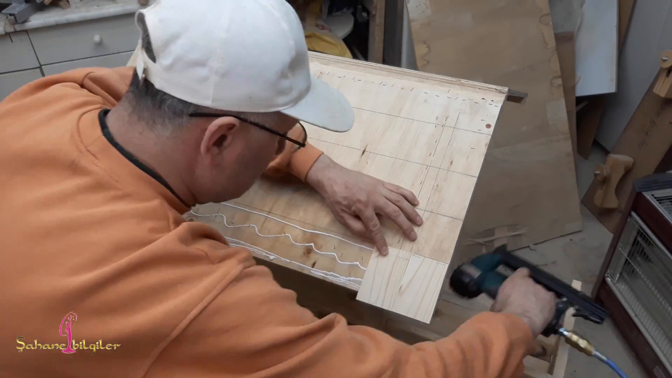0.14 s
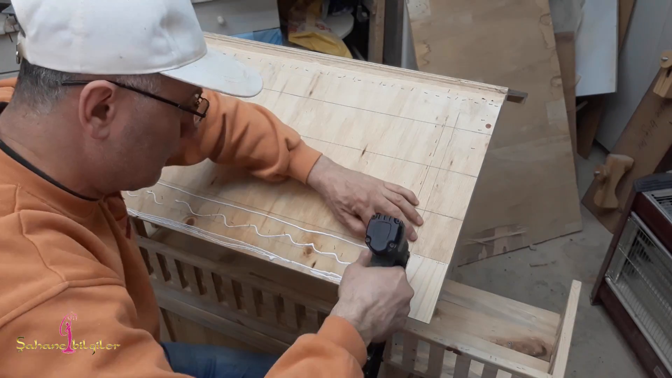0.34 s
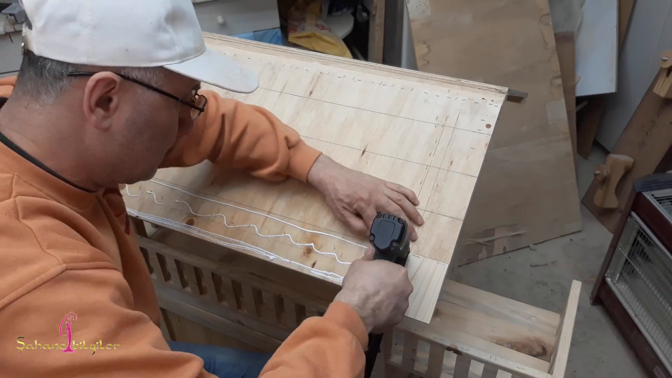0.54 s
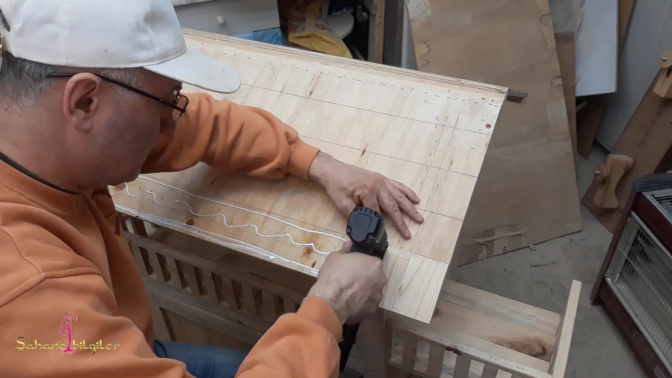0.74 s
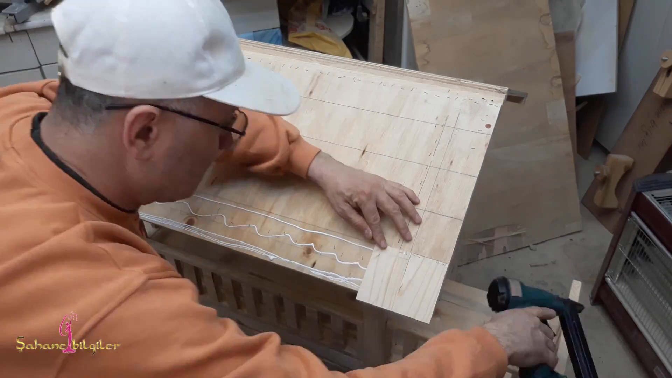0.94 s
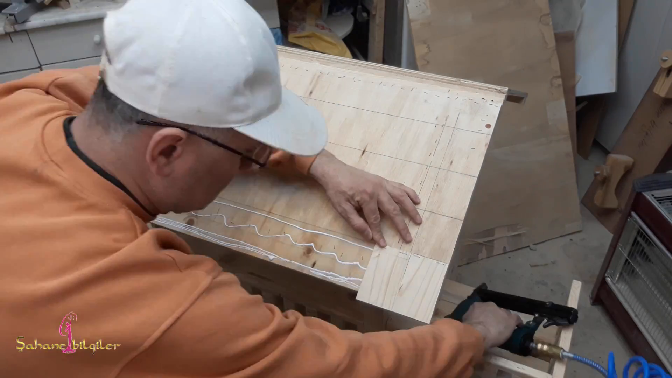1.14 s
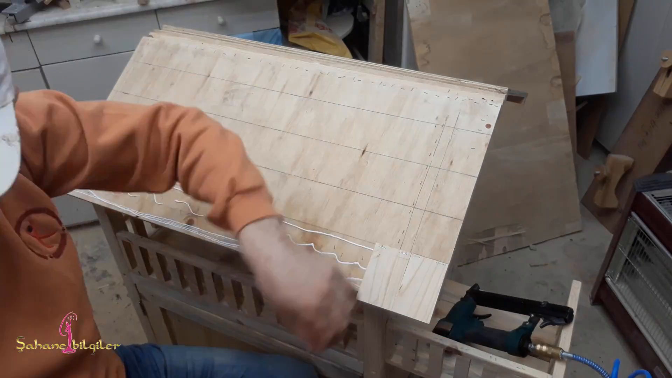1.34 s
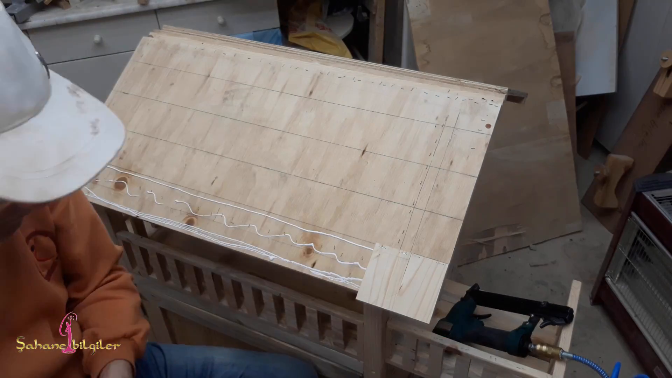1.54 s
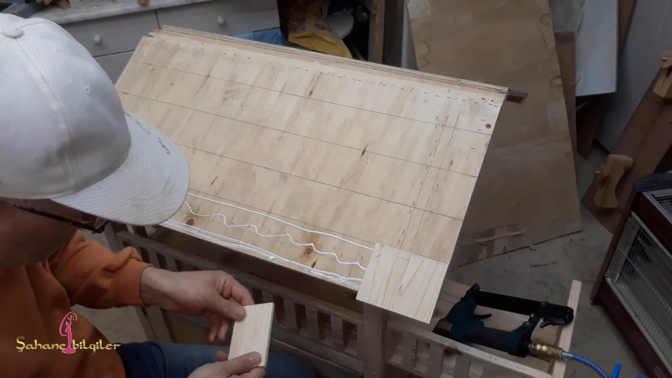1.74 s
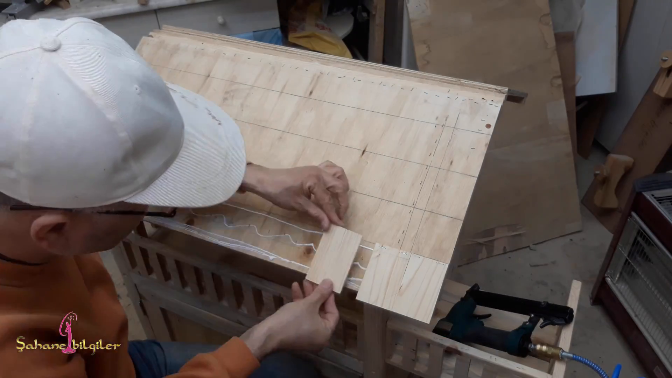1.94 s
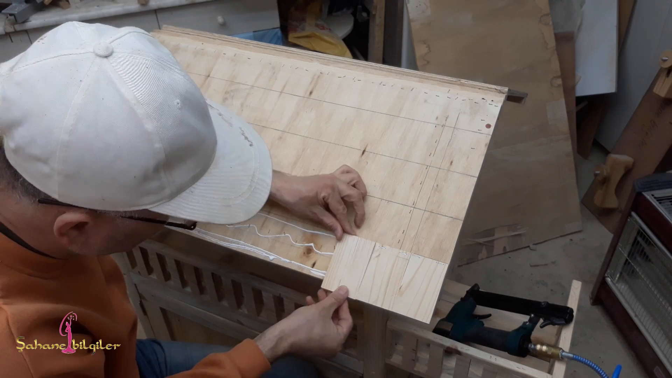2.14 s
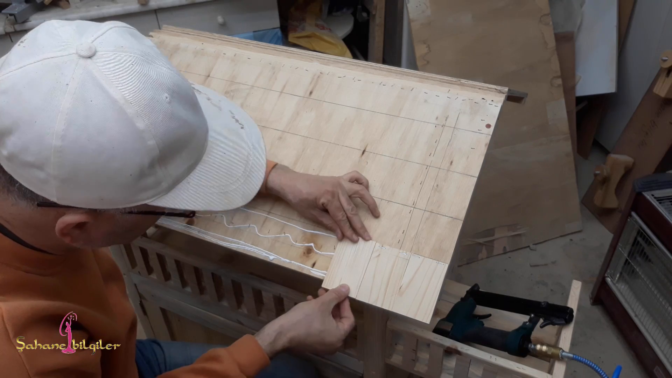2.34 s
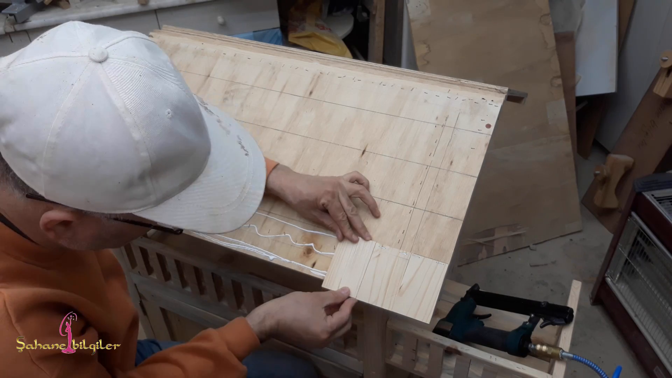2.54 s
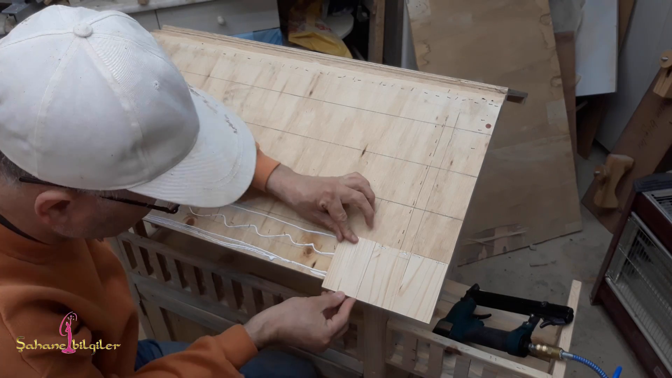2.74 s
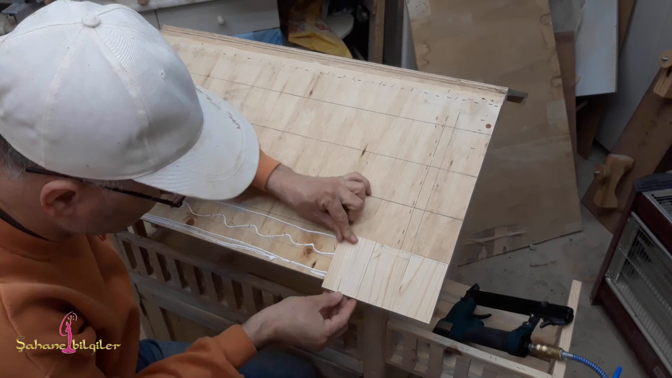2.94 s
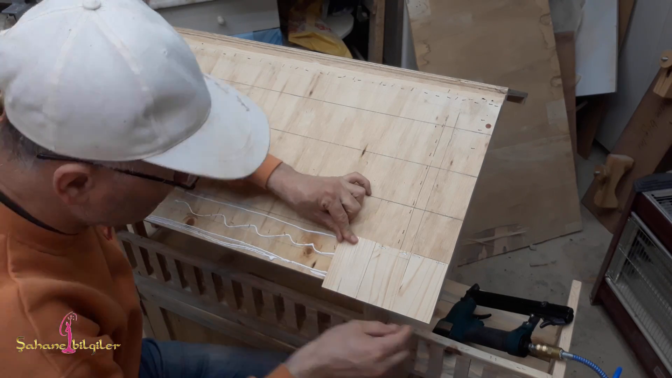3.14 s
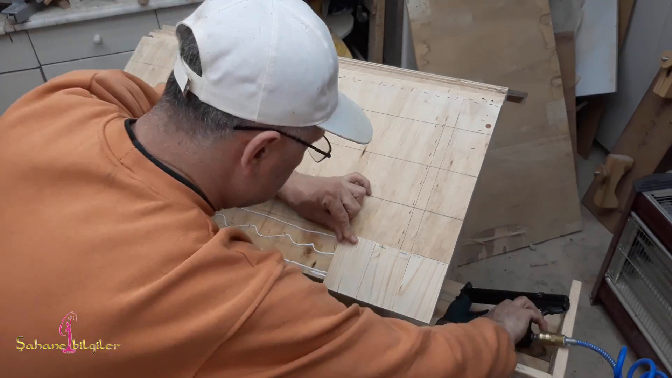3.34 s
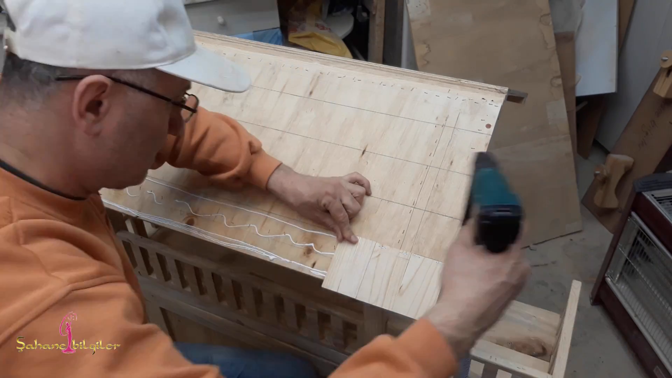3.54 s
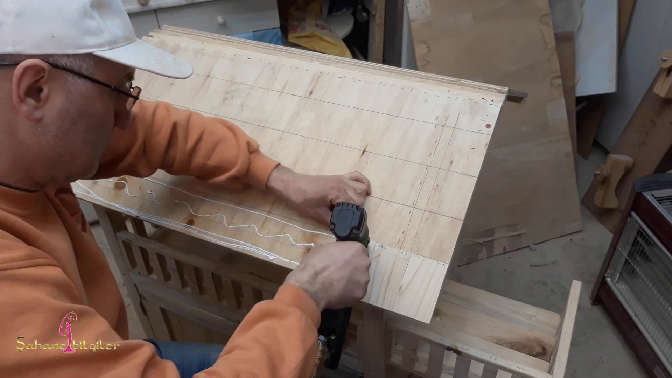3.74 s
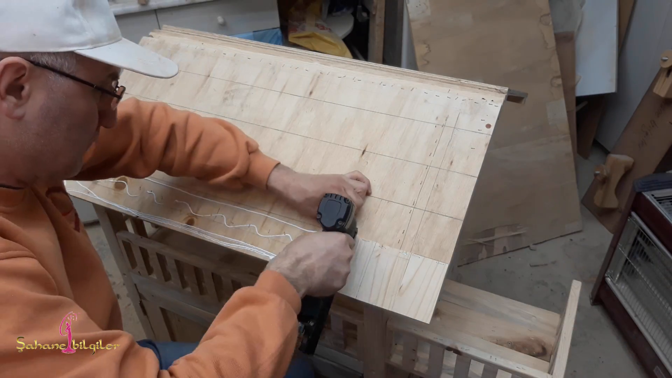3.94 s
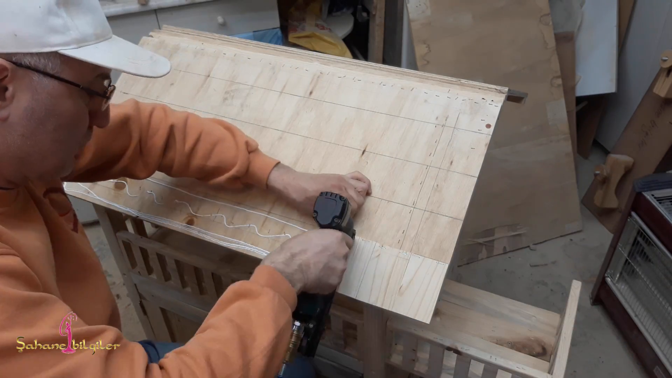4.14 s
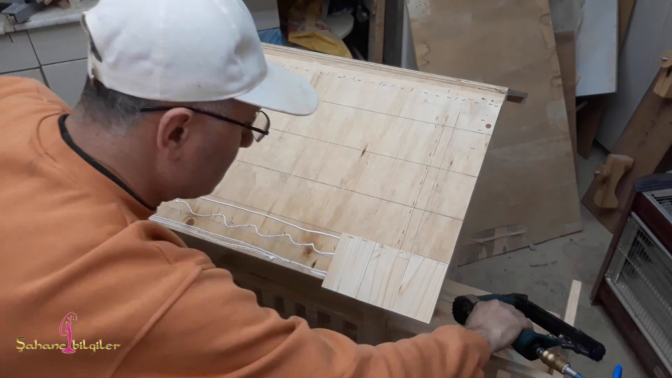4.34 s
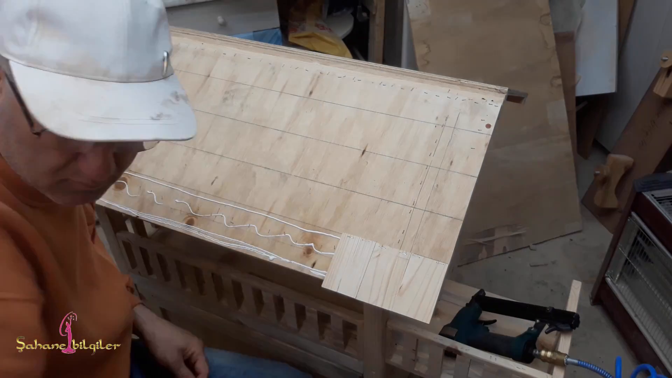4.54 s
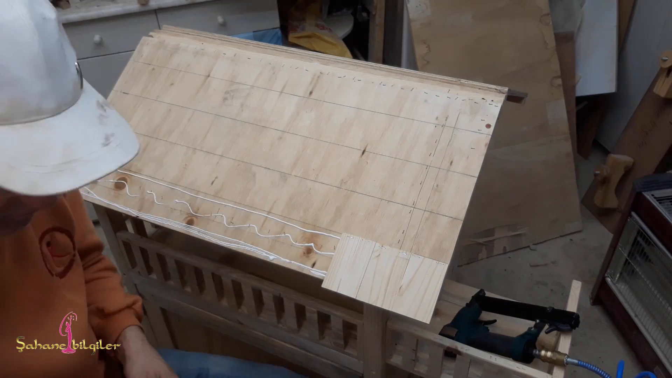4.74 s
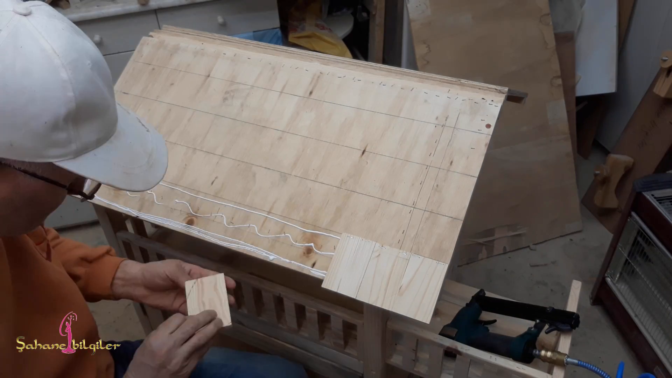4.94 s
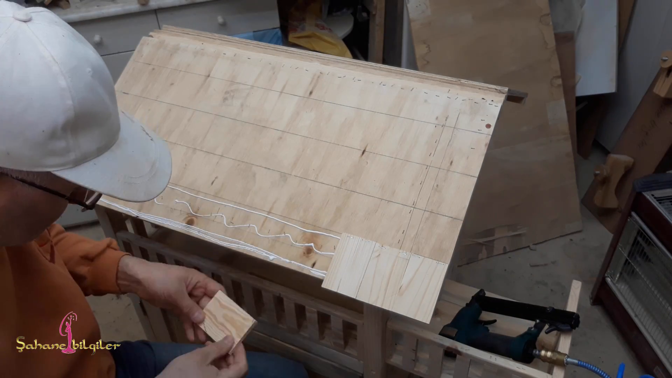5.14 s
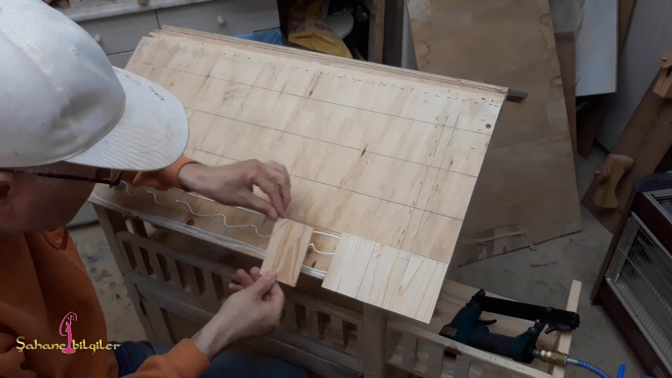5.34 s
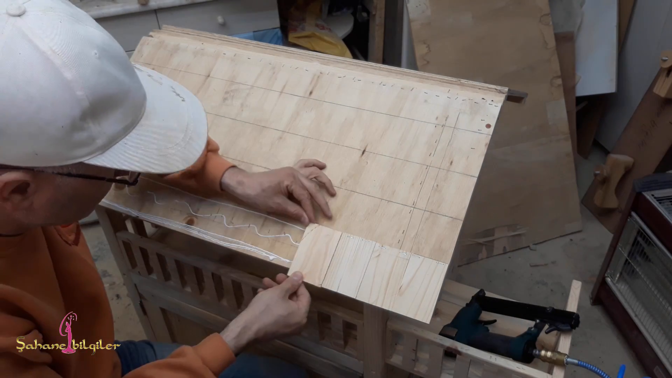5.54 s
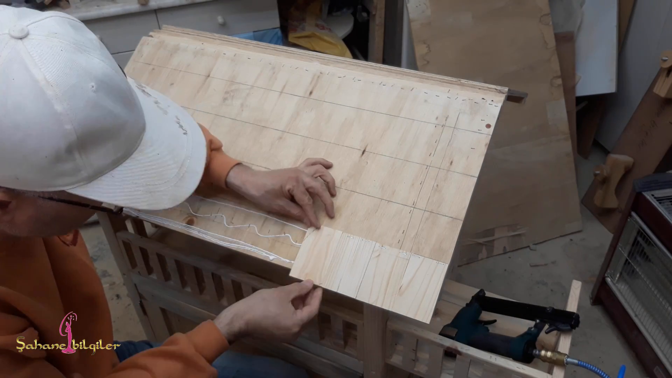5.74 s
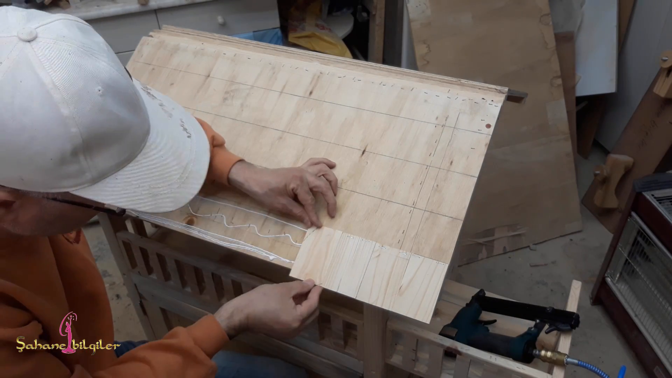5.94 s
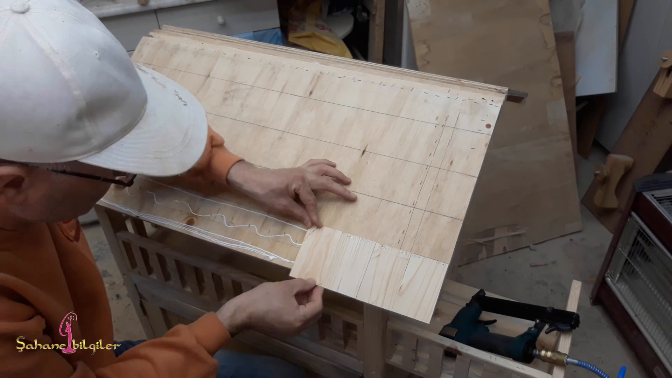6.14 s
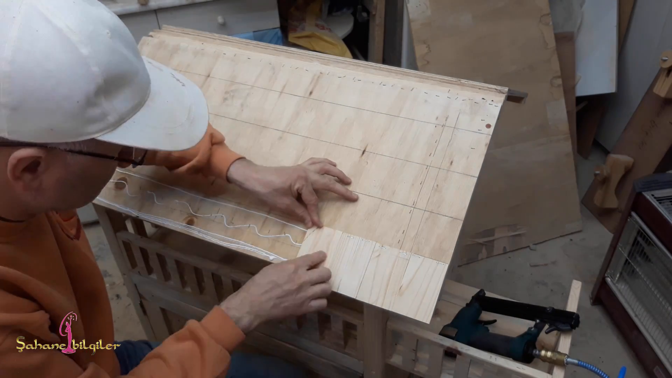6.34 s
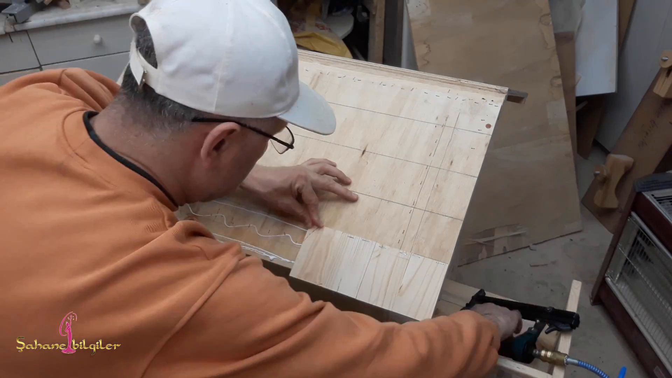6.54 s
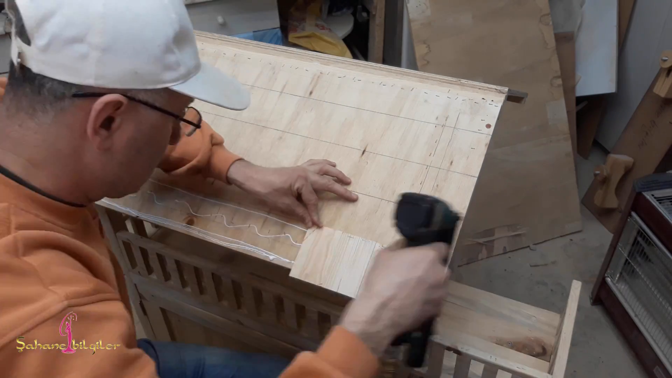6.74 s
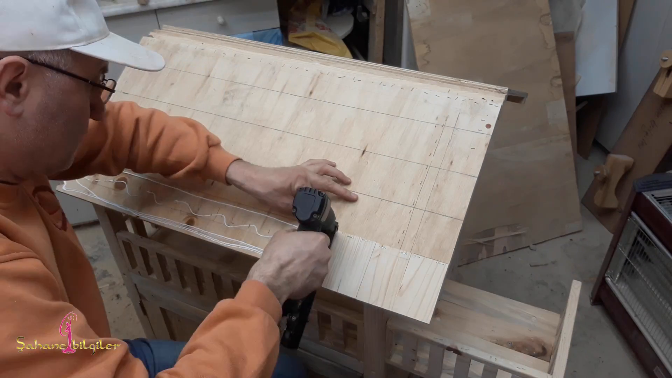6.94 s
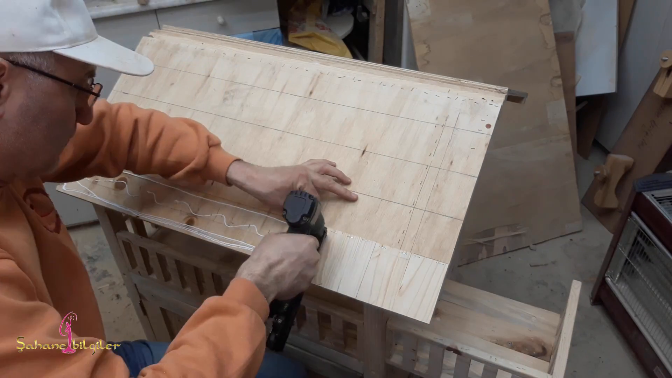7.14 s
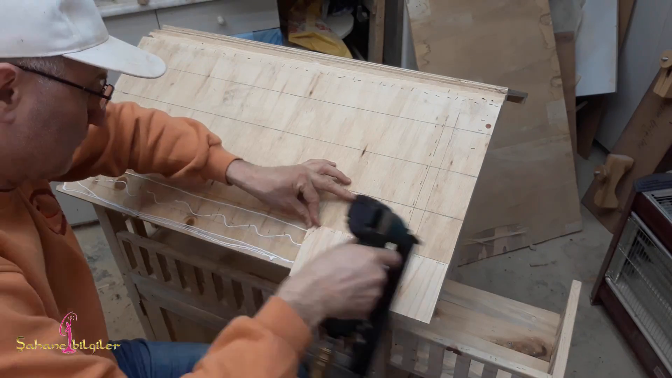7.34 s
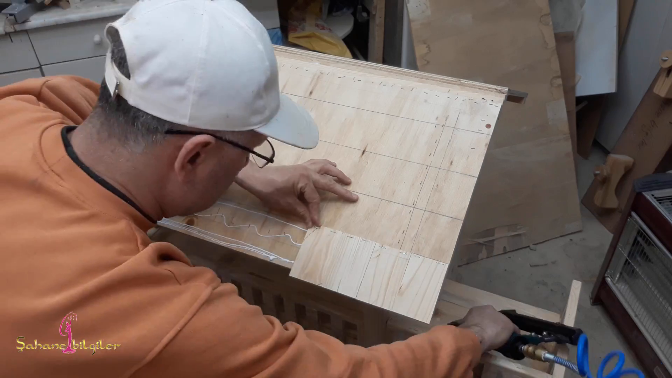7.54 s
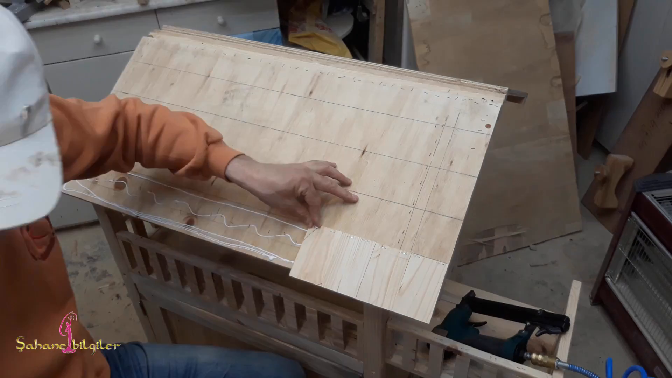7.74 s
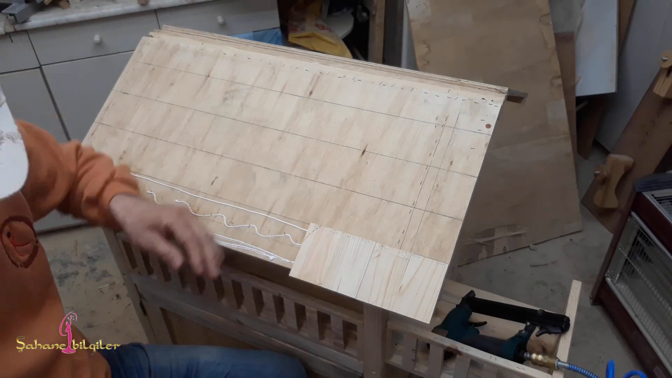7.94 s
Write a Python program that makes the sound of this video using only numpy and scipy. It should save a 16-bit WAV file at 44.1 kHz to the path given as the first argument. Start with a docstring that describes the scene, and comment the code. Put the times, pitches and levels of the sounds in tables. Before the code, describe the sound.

A heater motor runs throughout: steady mid and high tones, a raspy buzz fluttering about sixteen times a second, and a broad rush of air. Faint taps on wood come at 0.15, 0.2 and 0.5 seconds. An air nailer fires at 0.55 and 0.82, each shot a bright, hard crack with a short thump, venting hiss, piston puff and tiny rattle; the first rings the board. The tool knocks down on the bench around 1.15. Quiet tile ticks follow at 1.7 and 3.3. Shots return at 3.9 and 4.16, with a firmer wooden landing near 4.45 and a knock at 4.65. A tap at 7.0 precedes the last pair at 7.12 and 7.3; the nailer is laid down at 7.6. The hum drops suddenly with every shot, stays low about a quarter second, then swells back. Close microphone, short dull room tail, identical in both channels.

```python
"""Air nailer in a small workshop

A heater's motor hums while wooden tiles are fixed to a glued board: steady tones, a warbling buzz and a rush of air.
Tool and tiles knock on wood, made from noise shaped by the wood's resonances.
An air nailer fires three pairs of shots, built from bursts of noise, a thump and a ringing board.
It is laid on the bench after each pair.
An automatic gain control ducks the hum at every shot, holds, and lets it swell back."""
import sys
import numpy as np
from scipy import signal
from scipy.fft import rfft, irfft
from scipy.io import wavfile
from scipy.ndimage import uniform_filter1d, minimum_filter1d

SR = 44100
rng = np.random.default_rng(int(sys.argv[2]) if len(sys.argv) > 2 else 0)


def wrap_up_sound(samples):
    """Save the sound to the file named by the first command line argument, as 16-bit audio."""
    columns = np.atleast_2d(samples).T
    # keep every value between -1 and 1, then stretch to whole-number steps
    tamed = np.clip(columns, -1, 1)
    steps = np.round(tamed * 32767).astype(np.int16)
    wavfile.write(sys.argv[1], SR, steps)


N = 356769  # length of the scene in samples

TURN_HZ = 16.008  # turns of the motor shaft per second
BLADES = 12
EDGE_HZ = 15800  # top of the sound's frequency range
BUZZ_PULSE = 0.5  # depth of the buzz's pulsing (0-1)
PULSE_AT_TURN = 0.37  # where in each turn the pulse peaks (0-1)

# Motor tones, blade harmonics and their sidebands, before they waver.
# Each row: multiple of the turn rate, rms level in dB.
MOTOR_TONES = [(12, -62.5), (24, -51), (25, -60), (36, -63), (48, -61), (59, -61), (60, -51), (61, -58),
               (71, -59), (72, -52.5), (82, -63), (83, -53), (84, -48), (85, -56), (90, -62), (95, -63),
               (96, -46), (97, -64), (107, -60), (108, -58.5), (242, -61), (264, -57.5), (289, -56.5),
               (553, -67), (554, -68)]
# The blades' buzz, before it pulses.
# Each row: frequency in Hz, rms level of one blade harmonic in dB.
BLADE_BUZZ = [(1500, -89), (1900, -59), (2500, -62), (2900, -59.5), (3050, -58), (3270, -54.5),
              (3470, -53.5), (3650, -63), (3850, -51), (4030, -54.5), (4230, -71.5), (4420, -58),
              (4650, -73), (6100, -68), (7000, -79.5)]
# The rush of air, before the housing colours it.
# Each row: frequency in Hz, level in dB per Hz.
AIR_RUSH = [(20, -103), (130, -103), (240, -95.5), (340, -84.5), (650, -87), (1050, -76.5), (1700, -77.5),
            (2800, -79.5), (3600, -76.5), (4800, -80.5), (6100, -80), (6600, -84), (9500, -87.5),
            (15600, -88.5)]
# Resonances of the heater's housing; a negative lift is a dip.
# Each row: frequency in Hz, width in Hz, lift in dB.
HOUSING_MODES = [(370, 76, 5), (769, 85, 6.5), (1772, 107, 6.5), (2463, 160, 6), (3080, 51, -14),
                 (5300, 200, -0.5), (6100, 140, 4), (7450, 240, -5), (7900, 410, 3.5), (8860, 100, -11),
                 (13150, 200, 5.5), (14950, 600, 4)]
# The nailer's shots; t60 is the time to fade by 60 dB.
# Each row: start in seconds, crack in dB, venting in dB, venting length in seconds, board's ring in dB,
# piston's return in seconds, exhaust in dB, recoil in dB, rattle length in seconds,
# pitch of the last ring in Hz, t60 of the last ring in seconds.
NAILER_SHOTS = [(0.5527, 3, 1.5, .022, 3, 0.59, -5, 7, .014, 1084, 0.04),
                (0.82, 5, -3, .012, -11, .8546, -3.5, -5, 0.0053, 850, .012),
                (3.8962, 8, 2, .023, -12, 3.9333, -2.5, -1, .011, 745, .012),
                (4.1587, 7.5, 1.5, .0096, -10, 4.1986, -2, -3, 0.0042, 700, .006),
                (7.1229, 6.5, 3, .022, 3, 7.154, -.5, 3, .014, 860, 0.085),
                (7.302, 8.5, 2.5, .011, -4, 7.3357, 0, 5.5, .0055, 740, .006)]
# Shape of the spectrum of air leaving as the nail is driven.
# Each row: frequency in Hz, relative level in dB per Hz.
BLAST_SPECTRUM = [(20, -16), (100, -27), (280, -11), (700, -2), (1700, -6), (3500, -0.5), (6000, 0.5),
                  (11000, 1.5), (15600, -2)]
# Shape of the spectrum of air leaving as the piston returns.
# Each row: frequency in Hz, relative level in dB per Hz.
EXHAUST_SPECTRUM = [(20, -12), (120, -24), (400, 10), (1000, 5), (2500, 7), (6000, 5), (11000, 2),
                    (15600, 4.5)]
# Resonances of the nailer.
# Each row: frequency in Hz, width in Hz, lift in dB.
NAILER_MODES = [(1090, 200, 6), (1500, 220, 6.5), (1935, 210, 7.5), (2735, 120, 5), (3940, 360, 0.5),
                (5690, 910, 2), (6200, 400, 1), (8520, 400, 2), (9500, 740, 3), (12200, 350, 3.5),
                (14550, 400, 9.5)]
# Single knocks of tool and tiles on wood.
# Each row: start in seconds, level in dB, brightness in dB per octave, t60 in seconds.
WOOD_KNOCKS = [(.150, -40.5, -4, 0.14), (0.219, -34, 4, .03), (.476, -32, 0.5, 0.072),
               (1.089, -33.5, -8, .15), (1.708, -36, 11, .03), (3.297, -34, -3, 0.14), (3.8, -40.5, -6, .1),
               (4.006, -25, 2, 0.12), (4.654, -24.5, 4, 0.095), (7.0083, -22, .5, 0.047),
               (7.022, -36, -19, 0.074)]
# Shape of the bench's response to a blow.
# Each row: frequency in Hz, relative level in dB per Hz.
BENCH_SPECTRUM = [(20, -33), (160, -55.5), (280, -14.5), (1000, -9.5), (2000, -4), (4000, -4),
                  (7000, -11.5), (15600, -20.5)]
# Resonances of the bench; a negative lift is a dip.
# Each row: frequency in Hz, width in Hz, lift in dB.
BENCH_MODES = [(297, 42, 0.5), (403, 81, 11.5), (513, 69, 11), (640, 94, -14), (790, 160, 10),
               (964, 42, 18.5), (1117, 167, 12), (1300, 100, -18), (1458, 126, 11.5), (1670, 59, 10),
               (1813, 130, 12), (2820, 89, 3), (3300, 150, 2), (4340, 150, 2)]
# The nailer is laid on the bench.
# Each row: first touch in seconds, touch in dB, landing in seconds, landing in dB,
# landing's brightness in dB per octave, time between rocks in seconds, loss per rock in dB.
BENCH_LANDINGS = [(1.1477, -25, 1.1695, -17.5, -1, 0.036, 6), (4.415, -24.5, 4.4737, -12.5, 0.5, .018, 6.5),
                  (7.573, -22, 7.6585, -21, -1, .018, 4.5)]


def amp(db):
    """Turns decibels into a gain."""
    return 10 ** (np.asarray(db) / 20)


def unit(x):
    """Scales a sound to rms 1."""
    return x / np.sqrt(np.mean(x ** 2) + 1e-20)


def read(points, hz):
    """Reads a spectrum between its points, along a log-frequency axis."""
    point_hz, db = np.transpose(points)
    return np.interp(np.log(hz + 1), np.log(point_hz), db)


def add(mix, start, sound):
    """Mixes a sound in at a start time in seconds."""
    part = mix[round(start * SR):][:len(sound)]
    part += sound[:len(part)]


def noise(size, spectrum, resonances, tilt_db=0):
    """Noise with a spectrum in dB per Hz, lifted at resonances and tilted per octave."""
    hz = np.fft.rfftfreq(size, 1 / SR)
    db = read(spectrum, hz)
    for centre_hz, width_hz, lift_db in resonances:
        db = db + lift_db * 2 ** -((2 * (hz - centre_hz) / width_hz) ** 2)
    # the tilt pivots at 1 kHz and goes no further below 300 Hz
    db = db + tilt_db * np.log2(np.maximum(hz, 300) / 1000)
    white = rfft(rng.standard_normal(size))
    return irfft(white * amp(db), size) * np.sqrt(SR / 2)


def envelope(t, rise, length, t60):
    """Rises, starts to fade after a length, then dies by 60 dB per t60; all in seconds."""
    fade = np.exp(-np.log(1000) * np.maximum(t - length, 0) / t60)
    return np.clip(t / rise, 0, 1) * fade


def wander(low_hz, high_hz):
    """A random drift of rms 1, summed from ten sines; the slower ones are stronger."""
    t = np.arange(N) / SR
    drift = np.zeros(N)
    for hz in np.geomspace(low_hz, high_hz, 10):
        drift += np.sin(2 * np.pi * (hz * t + rng.random())) / np.sqrt(hz)
    return unit(drift)


def revolve(lines, turns):
    """Plays lines of given rms level, one for each multiple of the turn rate, along the shaft's angle."""
    size = 2 * (len(lines) - 1)
    random_phases = np.exp(2j * np.pi * rng.random(len(lines)))
    one_turn = irfft(lines * random_phases) * size / np.sqrt(2)
    return np.interp(turns % 1, np.arange(size) / size, one_turn)


def motor(sideband_db=-12, valley_db=-22, surge_turns=0.0019, wobble_turns=0.00028,
          throb=0.017, chop=0.072, shift=0.63, waver_db=0.77):
    """Steady tones, air, and a buzz of blade harmonics that warbles as the shaft surges once a turn."""
    turns = TURN_HZ * np.arange(N) / SR + wobble_turns * wander(0.298, 5)
    orders = np.arange(8193)  # multiples of the turn rate

    tones = np.zeros(len(orders))
    for order, db in MOTOR_TONES:
        tones[round(order)] = amp(db)
    hum = revolve(tones, turns) * amp(waver_db * wander(1, 12))

    # buzz lines weaken with distance from a blade harmonic, down to the valley level
    off_blade = abs((orders + BLADES / 2) % BLADES - BLADES / 2)
    buzz_db = read(BLADE_BUZZ, orders * TURN_HZ) + np.maximum(sideband_db * off_blade, valley_db)
    in_range = (orders > 2 * BLADES) * (orders * TURN_HZ < EDGE_HZ)
    buzz = amp(buzz_db) * in_range

    # the buzz is loudest while the shaft speeds up, and slowly changes its pattern
    load = np.cos(2 * np.pi * (turns - PULSE_AT_TURN))
    surging = turns - surge_turns * load
    blend = shift * wander(0.1967, 3)
    rasp = np.cos(blend) * revolve(buzz, surging) + np.sin(blend) * revolve(buzz, surging)
    rasp = rasp * (1 + BUZZ_PULSE * load)

    # the air pulses a little with each turn and each blade
    pulsing = 1 + throb * load + chop * np.sin(2 * np.pi * BLADES * turns)
    air = noise(N, AIR_RUSH, HOUSING_MODES) * pulsing
    return hum + rasp + air


def workshop(x, wet_db=-29, t60=0.22, dull_hz=4500):
    """Adds a short, dull tail of fading noise, as from a room full of timber."""
    t = np.arange(SR // 3) / SR
    tail = rng.standard_normal(len(t)) * envelope(t, 0.026, 0.013, t60)
    tail = signal.sosfilt(signal.butter(1, dull_hz, fs=SR, output="sos"), tail)
    tail = tail / np.linalg.norm(tail)
    return x + amp(wet_db) * signal.fftconvolve(x, tail)[:N]


def knock(tilt_db, t60, split_hz=2300, body_rise=0.00296, body_length=0.0094, treble_share=0.5):
    """A blow on the bench: the treble comes first and dies sooner than the wooden body."""
    t = np.arange(SR // 4) / SR
    ring = unit(noise(len(t), BENCH_SPECTRUM, BENCH_MODES, tilt_db))
    body = signal.sosfiltfilt(signal.butter(2, split_hz, fs=SR, output="sos"), ring)
    treble = ring - body
    treble = treble * envelope(t, 0.0004, 0.0018, t60 * treble_share)
    return body * envelope(t, body_rise, body_length, t60) + treble


def knocks():
    """Tool and tiles tap the wood as they are handled."""
    out = np.zeros(N)
    for start, db, tilt_db, t60 in WOOD_KNOCKS:
        add(out, start, amp(db) * knock(tilt_db, t60))
    return out


def set_downs(touch_tilt_db=-3.5, touch_t60=0.15, drag_gap=0.03, drag_loss_db=6.0,
              dulling_db=2.5, land_t60=0.095, settle=0.042):
    """The nailer touches the bench, drags with fading bumps, lands and rocks, each rock softer and duller."""
    out = np.zeros(N)
    for touch_s, touch_db, land_s, land_db, tilt_db, rock_gap, loss_db in BENCH_LANDINGS:
        bump_times = np.arange(touch_s, land_s - drag_gap / 2, drag_gap)
        for k, start in enumerate(bump_times):
            add(out, start, amp(touch_db - drag_loss_db * k) * knock(touch_tilt_db, touch_t60))
        rock_times = np.arange(land_s, land_s + settle, rock_gap)
        for k, start in enumerate(rock_times):
            add(out, start, amp(land_db - loss_db * k) * knock(tilt_db - dulling_db * k, land_t60))
    return out


def bounce(hz, t60, tick_db=-9, tick_t60=0.0037):
    """One blow of the nose: a hard tick of noise and a brief ring of the board."""
    t = np.arange(SR // 8) / SR
    ring = np.sin(2 * np.pi * hz * t) * envelope(t, 0.0001, 0, t60)
    tick = rng.standard_normal(len(t)) * envelope(t, 0.0001, 0, tick_t60)
    return ring + amp(tick_db) * tick


def recoils(board_hz=1480, board_t60=0.037, seat_share=0.7, lag=0.0025, loss_db=2.5, pressed_t60=0.0067,
            scatter_octaves=0.45, low_cut_hz=220, count=4):
    """The board rings as the nail seats; later the nose rattles, each bounce weaker and freer to ring."""
    out = np.zeros(N)
    for start, _, _, vent_length, board_db, return_s, _, recoil_db, rattle, last_hz, last_t60 in NAILER_SHOTS:
        add(out, start + seat_share * vent_length, amp(board_db) * bounce(board_hz, board_t60))
        # the piston's return sets off the rattle
        for k, detune in enumerate(rng.uniform(-1, 1, count)):
            lifted = k / (count - 1)  # 0 at the first bounce, 1 at the last
            scattered = k < count - 1  # only the last bounce keeps its listed pitch
            hz = last_hz * 2 ** (scatter_octaves * detune * scattered)
            t60 = pressed_t60 + lifted ** 2 * (last_t60 - pressed_t60)
            add(out, return_s + lag + rattle * lifted, amp(recoil_db - loss_db * k) * bounce(hz, t60))
    return signal.sosfilt(signal.butter(2, low_cut_hz, "highpass", fs=SR, output="sos"), out)


def jet(size, spectrum, sputter_db=1.5):
    """Compressed air sputters about every millisecond as it passes the nailer's resonances."""
    sputter = unit(uniform_filter1d(rng.standard_normal(size), size=40))
    return unit(noise(size, spectrum, NAILER_MODES) * amp(sputter_db * sputter))


def nailer(valve_db=-18, valve_lead=0.0036, crack_rise=0.00087, crack_length=0.0051, crack_t60=0.046,
           vent_t60=0.064, exhaust_t60=0.041, thump_db=3, thump_hz=520, thump_t60=0.0059, puff_share=1.11):
    """The trigger valve spits, a crack drives the nail home, air vents, and the piston returns with a puff."""
    out = np.zeros(N)
    t = np.arange(SR // 5) / SR
    vent_rise, exhaust_rise = 0.008, 0.0012  # seconds
    thump = np.cos(2 * np.pi * thump_hz * t) * envelope(t, 0.00039, 0.00035, thump_t60)
    thump = amp(thump_db) * thump
    for start, crack_db, vent_db, vent_length, _, return_s, exhaust_db, _, rattle, _, _ in NAILER_SHOTS:
        valve = jet(len(t), BLAST_SPECTRUM) * envelope(t, 0.0006, 0.004, 0.04)
        crack = jet(len(t), BLAST_SPECTRUM) * envelope(t, crack_rise, crack_length, crack_t60)
        vent = jet(len(t), BLAST_SPECTRUM) * envelope(t, vent_rise, vent_length, vent_t60)
        puff = jet(len(t), EXHAUST_SPECTRUM) * envelope(t, exhaust_rise, puff_share * rattle, exhaust_t60)
        add(out, start - valve_lead, amp(valve_db) * valve)
        add(out, start, amp(crack_db) * crack + thump)
        add(out, start, amp(vent_db) * vent)
        add(out, return_s, amp(exhaust_db) * puff)
    return out


def scene():
    """Everything reaches one microphone, heard on both channels; the motor gets no room tail."""
    work = knocks() + set_downs() + recoils() + nailer()
    mono = motor() + workshop(work)
    return np.array([mono, mono])


def record(dry, threshold_db=-16, depth_db=18.0, hold=0.27, release=0.043, ceiling=1.4):
    """Gain control drops at once, holds and recovers; then soft overload and the band limit."""
    power = uniform_filter1d(dry[0] ** 2, size=90)  # averaged over about 2 ms
    power_db = 10 * np.log10(abs(power) + 1e-12)
    over_db = np.clip(power_db - threshold_db, 0, depth_db)
    # hold the largest excess of the last moments, then let it go smoothly
    half = round(hold * SR / 2)
    held_db = -minimum_filter1d(-over_db, 2 * half + 1, origin=half, mode="constant")
    keep = np.exp(-1 / (release * SR))
    smooth_db = signal.lfilter([1 - keep], [1, -keep], held_db)
    duck_db = np.maximum(held_db, smooth_db)
    loud = ceiling * np.tanh(dry * amp(-duck_db) / ceiling)
    band_limit = signal.firwin(401, EDGE_HZ, window=("kaiser", 8), fs=SR)
    return signal.oaconvolve(loud, band_limit[None], "same")


dry = scene()
out = record(dry)
wrap_up_sound(out)
```